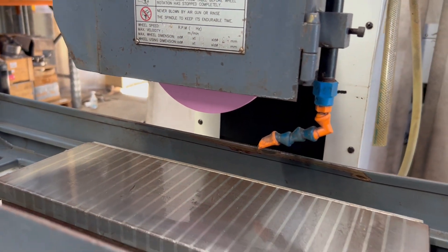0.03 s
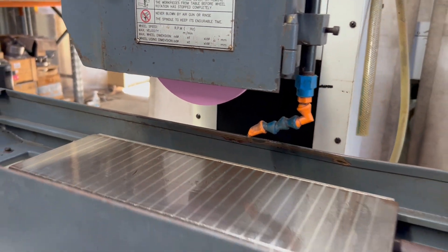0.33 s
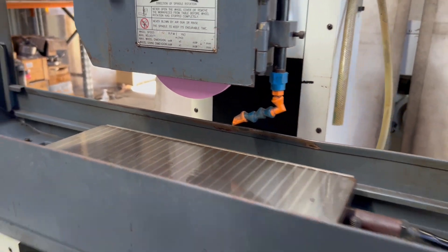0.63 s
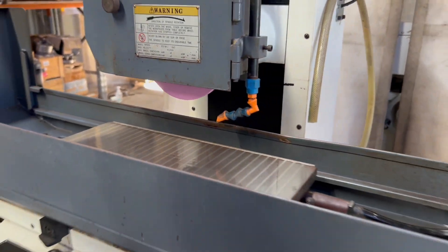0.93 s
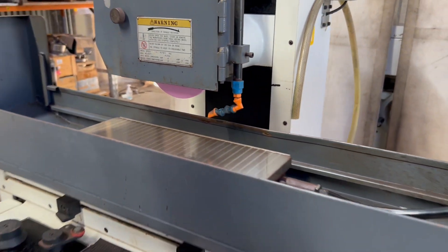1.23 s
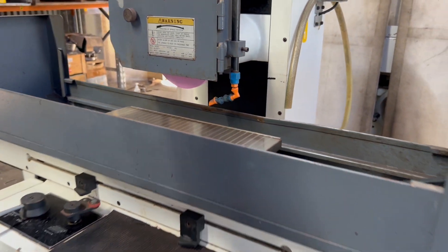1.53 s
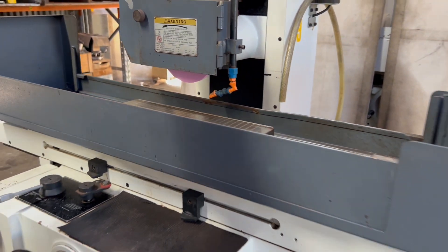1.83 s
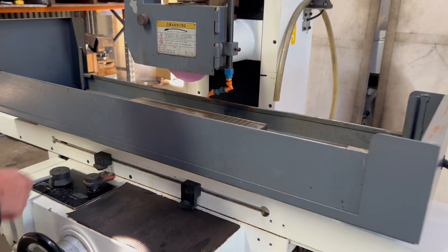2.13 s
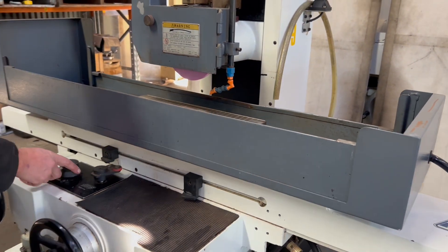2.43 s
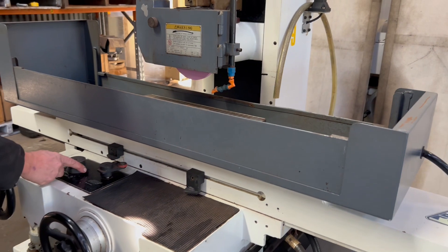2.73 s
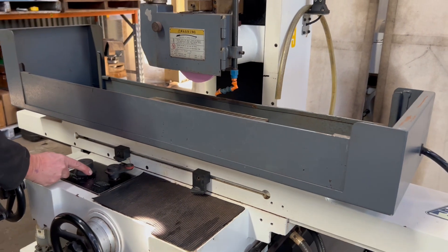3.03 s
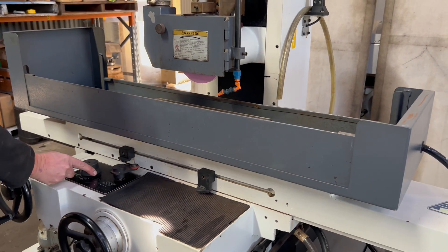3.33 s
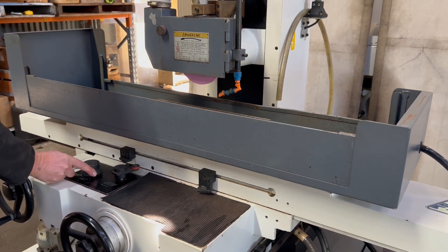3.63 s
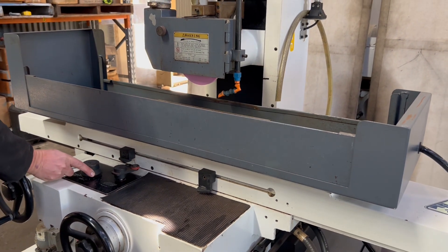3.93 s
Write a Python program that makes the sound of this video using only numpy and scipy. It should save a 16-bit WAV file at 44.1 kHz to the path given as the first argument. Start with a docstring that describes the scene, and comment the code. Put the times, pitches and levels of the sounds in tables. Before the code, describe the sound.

An idling grinding machine drones and whirs while a sleeve brushes it and a control clicks.

```python
"""A surface grinder idles in a workshop, heard from a spaced microphone pair that backs 0.6 m from the
wheel to the controls. Motor, pump and bearings sing in close, beating tones that shift among the wall
reflections; a clatter that repeats every belt turn rings the housings over a rush of air and a thin hiss.
At the controls a sleeve brushes the machine, its fibres catching and slipping, and a control clicks."""
import sys
import numpy as np
from scipy import signal
from scipy.fft import rfft, irfft
from scipy.io import wavfile
from scipy.ndimage import uniform_filter1d

SR = 44100
rng = np.random.default_rng(int(sys.argv[2]) if len(sys.argv) > 2 else 0)


def output_pcm(signal):
    """Save a mono or channel-first signal as 16-bit PCM at the path in sys.argv[1].

    Samples are clipped to [-1, 1] before scaling.
    """
    pcm = np.clip(np.atleast_2d(signal).T, -1, 1) * 32767
    wavfile.write(sys.argv[1], SR, np.round(pcm).astype(np.int16))


N = 176400


def undb(db):
    """Decibels to amplitude."""
    return 10 ** (np.asarray(db) / 20)


def curve(rows, axis=1):
    """One column of a time table, sample by sample."""
    rows = np.array(rows)
    return np.interp(np.arange(N) / SR, rows[:, 0], rows[:, axis])


def pan(db):
    """Constant-power gains with the left microphone db above the right."""
    gains = undb(np.array([[db], [-db]]) / 2)
    return gains / np.sqrt(np.mean(gains ** 2))


def walk(rate):
    """Smooth random drift with a spread near 1 and rate new values a second."""
    knots = rng.standard_normal(int(rate * N / SR) + 2)
    zigzag = np.interp(np.arange(N) / SR * rate, np.arange(len(knots)), knots)
    return uniform_filter1d(zigzag, int(SR / rate / 2)) * np.sqrt(2)


def response(points, size):
    """Gain at each FFT bin from rows of f/Hz, level/dB."""
    hz, db = np.array(points).T
    return undb(np.interp(np.log(np.fft.rfftfreq(size, 1 / SR) + 1), np.log(hz), db))


def colour(x, points):
    """Give white sound of rms 1 a spectrum of f/Hz, level/dB per Hz."""
    size = x.shape[-1]
    return irfft(rfft(x) * response(points, size) * np.sqrt(SR / 2), size)


# Stereo width at the microphones: f/Hz, side against middle/dB
WIDTH = [(60, -19), (250, -10), (700, -5), (3000, -5), (7500, 1), (11500, -5)]
def spread(pair):
    """Two unrelated sounds become left and right: alike in the bass, wider in the treble."""
    size = pair.shape[-1]
    mid, side = rfft(pair)
    side = side * response(WIDTH, size)
    return irfft(np.array([mid + side, mid - side]), size)


PATH_M, MIC_SPACING_M = 0.61, 0.14
def tone(hz, db, pan_db, clock, way, walls_db=-16, count=4, lead_rad=0.25, flutter_db=.6):
    """A machine tone reaches one microphone first; wall reflections add and cancel along the way."""
    places = np.linspace(0, 1, 128)
    along, across, phase = rng.uniform(-1.015, 1, (3, count, 1, 1))
    mics_m = np.array([[1], [-1]]) * MIC_SPACING_M / 2
    wavenumber = 2 * np.pi * hz / 343
    direct = np.exp(1j * lead_rad * np.sign(mics_m) * rng.choice([-1, 1]))
    detour_m = (along + 1) * PATH_M * places + across * mics_m
    walls = np.exp(1j * (wavenumber * detour_m + np.pi * phase)).sum(0)
    field = direct + undb(walls_db) * walls / np.sqrt(count)
    field /= np.sqrt(np.mean(abs(field) ** 2, axis=1, keepdims=True))
    wave = np.exp(2j * np.pi * (hz * clock + rng.random())) * undb(db + flutter_db * walk(14))
    heard = np.array([(np.interp(way, places, mic) * wave).real for mic in field])
    return np.sqrt(2) * pan(pan_db) * heard


# Machine tones, before trim: f/Hz, level at the wheel/dB, level at the controls/dB, left over right/dB
MACHINE_TONES = [(149,-47,-57,0), (196.5,-56,-55,-3), (248.3,-56,-56,-2), (297.9,-54,-55,-1),
                 (307.1,-46,-52,4), (347.6,-52,-58,4), (397.5,-53,-49.5,-4), (447,-57,-54,-2),
                 (479,-49,-64,-2), (496.6,-55,-53,4), (595.9,-52,-52.5,-5), (621.2,-52,-60,-2),
                 (763.5,-42,-54,0), (844.8,-51,-51,-9), (957,-49,-58,-8), (1070.5,-49.5,-58,-9),
                 (1120.3,-49,-57,-6), (1377.1,-38.5,-45.5,-4), (1414.8,-46,-57,0), (1426.8,-40,-52,-1),
                 (1434.7,-39,-53,1), (1446.7,-49,-50,-7), (1489.4,-50,-55,-6), (1506.4,-56,-55,0),
                 (1639.3,-52,-58,-6), (1734.3,-43,-55,-4), (1833.7,-41,-56,-3), (1863.5,-49,-57,-4),
                 (2121.5,-49,-65,-4), (2161.7,-53,-59,-4), (2326,-52,-60,1), (2447.6,-51,-56,1),
                 (2479.3,-53,-50,4), (2546.9,-41,-61,-1), (2576.7,-42,-58,5), (2803.9,-48,-68,9),
                 (2833.7,-50,-66,7), (3607,-55,-60,5), (3646.7,-54,-57,9), (3706.2,-54,-62,-4),
                 (3745.9,-53,-62,2), (3904.2,-52,-69,-3), (4360,-61,-79,5), (4527,-69,-70,4),
                 (4920,-72,-71,4), (7278,-71,-74,-3)]
# Throbbing tones: the same four columns, then rate/Hz, crest t/s, swing at the controls/dB
THROBBING_TONES = [(716.4, -44.5, -52.5, 2, 1.9, 3.27, 8), (2191.5, -49, -56.5, 1, 9.93, 3.68, 7.5)]
# Five tones that are loud only in certain spots: f/Hz
LOCAL_HZ = (663.8, 1407, 1477, 1590.2, 6099)
# Their balance: left over right/dB
LOCAL_PANS_DB = (3, -2, -3, -6, 7)
# The same five as the microphones pass: t/s, then level/dB of each
LOCAL_LEVELS = [(0, -42.5, -32.5, -47, -51, -74), (.7, -41, -37.5, -44, -54, -69),
                (1.28, -37.5, -44, -57, -59, -72), (1.8, -39, -48, -43, -45, -63),
                (2.1, -42, -45, -46, -43.5, -76), (2.4, -53, -49, -51, -46, -76),
                (3, -51, -50, -53, -46.5, -72), (3.6, -52, -49, -52, -48, -63)]
def hum(clock, way):
    """Motor, pump and bearings follow one shaft speed; two tones throb with motor slip or belt turn."""
    out = 0
    for hz, near, far, side in MACHINE_TONES:
        out += tone(hz, near + (far - near) * way, side, clock, way, walls_db=-10)
    for hz, near, far, side, rate, crest, depth in THROBBING_TONES:
        swell = depth * way * np.cos(2 * np.pi * rate * (clock - crest))
        out += tone(hz, near + (far - near) * way + swell, side, clock, way)
    out *= undb(np.interp(way, [0, 1], [0.5, -0.83]))  # trim from wheel to controls
    for k, hz in enumerate(LOCAL_HZ):
        out += tone(hz, curve(LOCAL_LEVELS, axis=k + 1), LOCAL_PANS_DB[k], clock, way)
    return out


# Ring of the housings, at the wheel: f/Hz, level/dB per Hz
HOUSING_SPECTRUM = [(150, -120), (400, -73.5), (700, -71.5), (900, -70), (1300, -72.5), (1430, -69.5),
                    (1560, -69), (1880, -69.5), (2010, -78.5), (2160, -63), (2260, -78), (2550, -67),
                    (2700, -80), (2870, -75), (2960, -88), (3450, -84.5), (3650, -73), (3800, -81),
                    (3950, -68.5), (4100, -92), (4350, -78.5), (4520, -87.5), (8500, -100), (12000, -115)]
def belt_clatter(clock, way, belt_hz=9.931, patterns=4):
    """One belt turn of rattle repeats through the housings; its pattern changes with the place."""
    size = 2 * int(SR / belt_hz / 2)
    fine_size = size * 8  # oversampled to follow the wandering speed
    position = (clock * belt_hz % 1 * fine_size).astype(int) % fine_size
    out = 0
    for k in range(patterns):
        rattle = colour(spread(rng.standard_normal((2, size))), HOUSING_SPECTRUM)
        turn = signal.resample(rattle, fine_size, axis=1)
        crossfade = np.cos(np.pi / 2 * np.clip(way * (patterns - 1) - k, -1, 1))
        out += crossfade * turn[:, position]
    return out * undb(-9 * way)


# Rush of air, before the rumble and treble gains: f/Hz, level/dB per Hz
RUSH_SPECTRUM = [(15, -107), (30, -86), (45, -71), (90, -71.5), (200, -76.5), (400, -80), (700, -71),
                 (1100, -78), (1500, -77.5), (2500, -91.5), (3100, -96.5), (3800, -88.5), (4800, -90.5),
                 (8500, -92), (10000, -110), (15000, -125)]
def air_rush(way, flicker_db=1.27):
    """Fan, wheel and oil rush; the rumble eases 1 dB with distance and the treble flickers."""
    rush = colour(spread(rng.standard_normal((2, N))), RUSH_SPECTRUM)
    rumble = signal.sosfiltfilt(signal.butter(2, 300, fs=SR, output="sos"), rush)
    treble = rush - rumble
    return rumble * undb(2 - way) + treble * undb(-4 + flicker_db * walk(11))


# Thin hiss: f/Hz, level/dB per Hz
HISS_SPECTRUM = [(4000, -118), (10500, -113), (11500, -104), (15000, -107)]
def high_hiss():
    """An even hiss at the top, the same in every place."""
    return colour(spread(rng.standard_normal((2, N))), HISS_SPECTRUM)


def pressure(at, rise, hold, release):
    """Pressure of one sleeve stroke: exponential swell, hold, exponential release."""
    t = np.arange(N) / SR
    return np.exp(-np.maximum(at - t, 0) / rise - np.maximum(t - at - hold, 0) / release)


# Resonances of the scuff: starting f/Hz, level/dB
SCUFF_RESONANCES = [(2250, -34), (2950, -35.5)]
def scuff(hiss, at=2.241, fall_per_s=14, width_hz=340):
    """A bright scuff opens the first stroke; its resonances fall as the sleeve slows."""
    slowing = np.exp(-fall_per_s * np.maximum(np.arange(N) / SR - at, 0))
    lowpass = signal.butter(2, width_hz / 2, fs=SR, output="sos")
    out = hiss * undb(-2)
    for hz, db in SCUFF_RESONANCES:
        band = signal.sosfilt(lowpass, rng.standard_normal(N) + 1j * rng.standard_normal(N))
        glide = np.exp(2j * np.pi * np.cumsum(hz * slowing) / SR)
        out += undb(db) * (band / band.real.std() * glide).real
    return out * pressure(at, rise=.008, hold=.007, release=.011)


# Dull body of the cloth, to the right: f/Hz, level/dB per Hz
CLOTH_BODY = [(200, -83), (600, -70), (1000, -58.5), (1300, -53), (1600, -62.5), (2000, -56), (2900, -73),
              (3600, -64.5), (6000, -100)]
# Hiss of the cloth, to the left: f/Hz, level/dB per Hz
CLOTH_HISS = [(600, -86), (2500, -74), (3600, -75.5), (5500, -81), (8500, -86.5), (11500, -98.5),
              (15000, -94)]
# Strokes by the controls: t/s, rise/s, hold/s, release/s, gain/dB, further gain of the body/dB
SLEEVE_STROKES = [(2.254, 0.015, 0.02, 0.0079, -1, -4), (2.295, 0.088, 0.022, 0.14, -7.5, -14),
                  (2.478, 0.031, 0.03, 0.1, -9, -15)]
# The cloth snags and lets go: t/s, gain of the hiss/dB
CLOTH_SNAGS = [(2.2432, 6), (2.2728, 6)]
def sleeve(slips_per_s=12000, rustle_db=1.3, snag_decay_s=.0006):
    """Fibres catch and slip on the machine: a scuff, two snags and duller strokes with hiss on top."""
    t = np.arange(N) / SR
    slips = (rng.random((2, N)) < slips_per_s / SR) * rng.standard_normal((2, N))
    slips *= undb(1.5 * rng.standard_normal((2, N)))  # fibres differ in strength
    slips = spread(slips / slips.std())
    body = colour(slips, CLOTH_BODY) * pan(-9)
    hiss = colour(slips[:, ::-1], CLOTH_HISS) * pan(4)
    strokes = 0
    for *shape, db, body_db in SLEEVE_STROKES:
        strokes += pressure(*shape) * undb(db) * (hiss + undb(body_db) * body)
    strokes *= undb(rustle_db * walk(250))  # the cloth catches unevenly
    snags = sum(undb(db) * (t > at) * np.exp(-abs(t - at) / snag_decay_s) for at, db in CLOTH_SNAGS)
    return strokes + hiss * snags + scuff(hiss)


# Contacts of the control: t/s, tick gain/dB, knock gain/dB
CONTACTS = [(2.5572, -39, -31), (2.5662, -24, -45), (2.5687, -25.5, -20)]
# Tick of the detent: f/Hz, level/dB per Hz
TICK_SPECTRUM = [(2000, -58), (4400, -56), (5300, -36), (6100, -49), (7000, -41), (7900, -44), (9200, -45),
                 (11000, -81), (15000, -55)]
# Modes of the control: f/Hz, relative level/dB, t60/s
KNOCK_MODES = [(1030, -3, .022), (1370, 0, .022)]
def control_click(tick_decay_s=0.0009, knock_rise_s=.0002):
    """The control ticks over its detent and knocks home."""
    out = 0
    for at, tick_db, knock_db in CONTACTS:
        age = np.maximum(np.arange(N) / SR - at, 0)
        burst = spread(rng.standard_normal((2, N))) * (age > 0) * np.exp(-age / tick_decay_s)
        ring = sum(undb(db - 60 * age / t60) * np.sin(2 * np.pi * hz * age)
                   for hz, db, t60 in KNOCK_MODES)
        knock = ring * (1 - np.exp(-age / knock_rise_s))
        out += undb(tick_db) * colour(burst, TICK_SPECTRUM) + undb(knock_db) * knock
    return out


# Path of the microphones: t/s, way (0 at the wheel, 1 at the controls)
MIC_PATH = [(0, 0.029), (.5, 0.19), (1, 0.42), (1.5, 0.58), (2, 0.83), (2.5, 0.95), (3, 0.91), (4, 0.95)]
def scene():
    """The idling grinder, heard on the way to its controls, and the hand at work there."""
    way = np.clip(curve(MIC_PATH), 0, 1)
    clock = np.cumsum(1 + .00018 * walk(5)) / SR  # machine time/s: the shaft speed wanders slightly
    hiss = high_hiss()
    return hum(clock, way) + belt_clatter(clock, way) + air_rush(way) + hiss + sleeve() + control_click()


def record(dry):
    """The recorder cuts the top steeply above 15.6 kHz."""
    return signal.sosfilt(signal.ellip(10, .2, 80, 15600, fs=SR, output="sos"), dry)


dry = scene()
out = record(dry)
output_pcm(out)
```